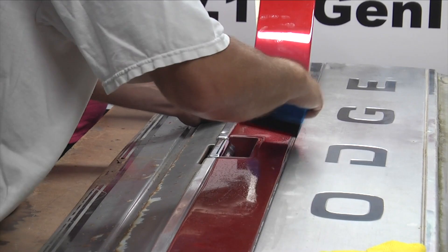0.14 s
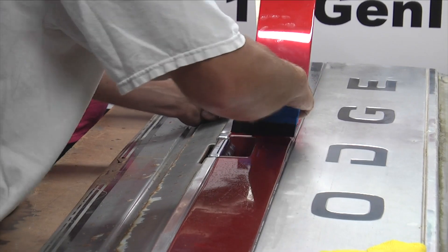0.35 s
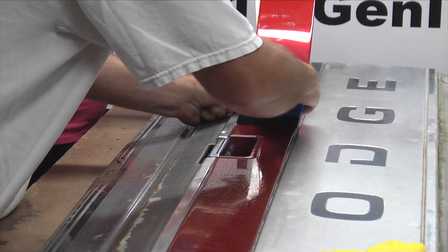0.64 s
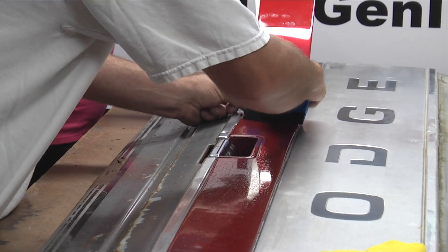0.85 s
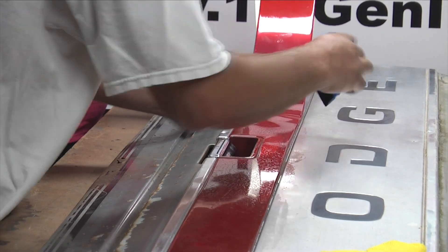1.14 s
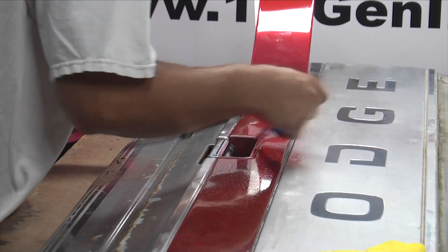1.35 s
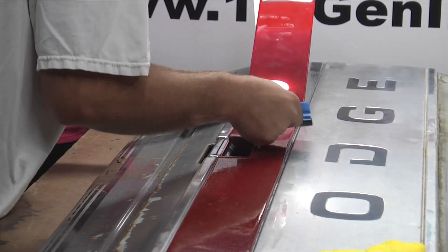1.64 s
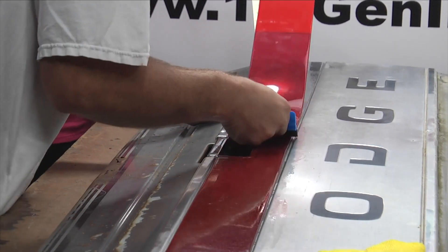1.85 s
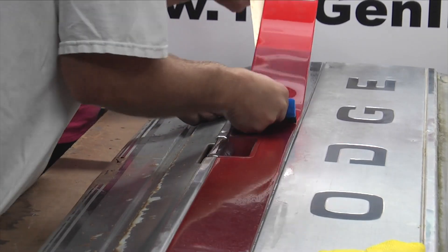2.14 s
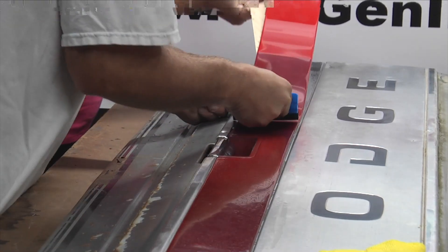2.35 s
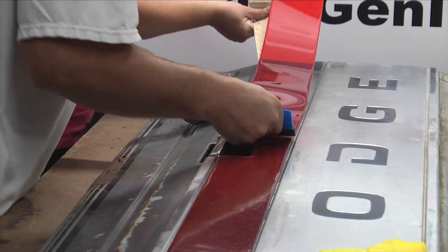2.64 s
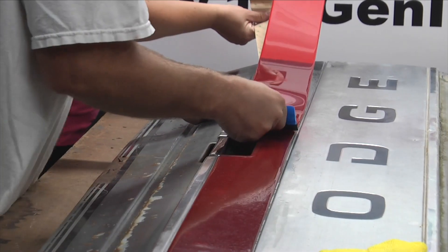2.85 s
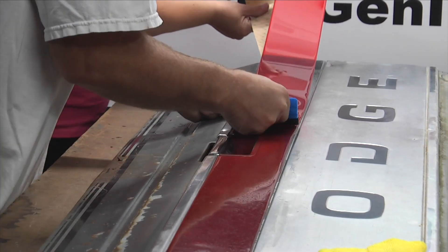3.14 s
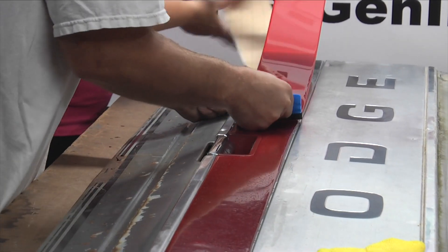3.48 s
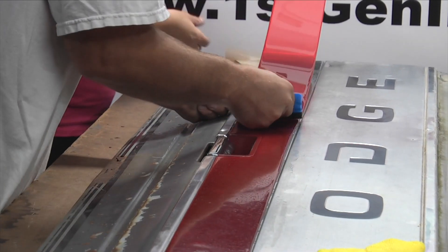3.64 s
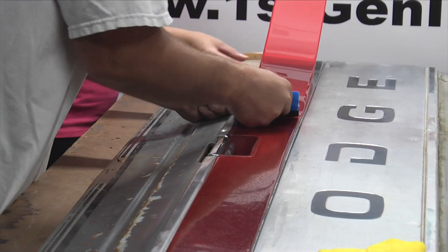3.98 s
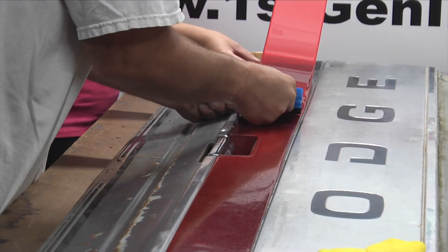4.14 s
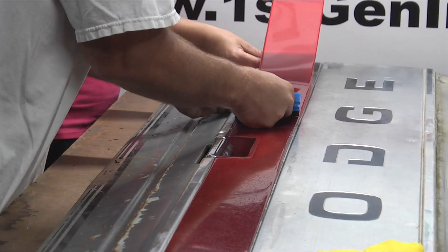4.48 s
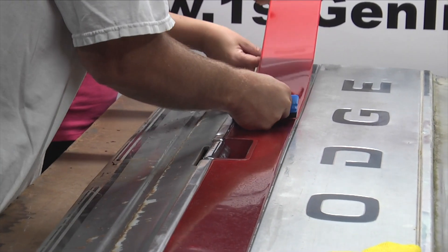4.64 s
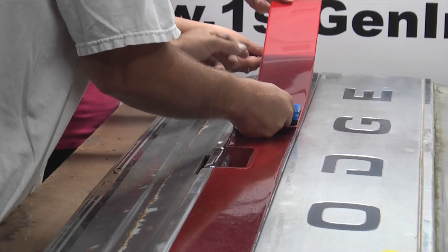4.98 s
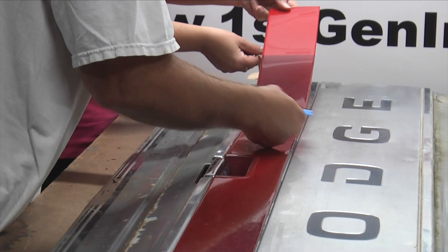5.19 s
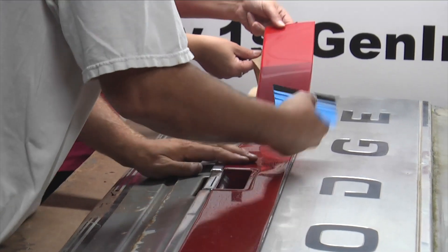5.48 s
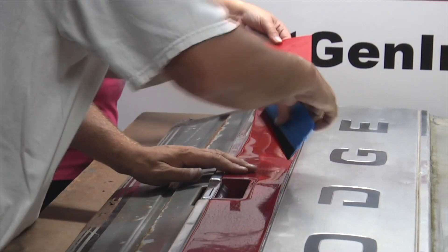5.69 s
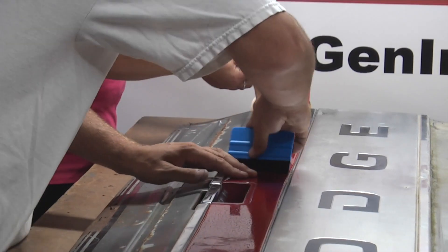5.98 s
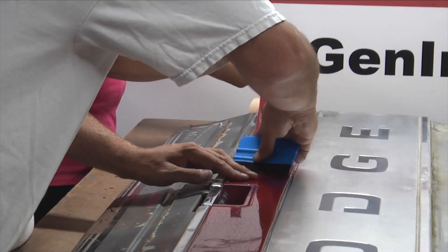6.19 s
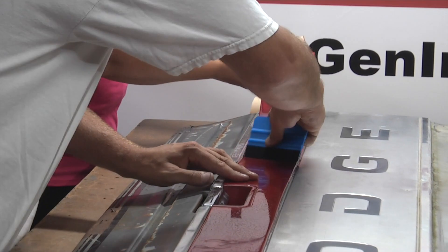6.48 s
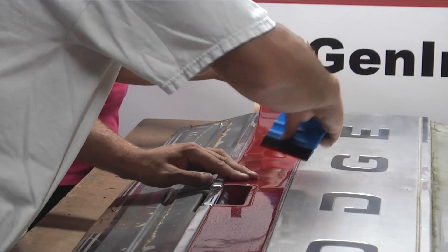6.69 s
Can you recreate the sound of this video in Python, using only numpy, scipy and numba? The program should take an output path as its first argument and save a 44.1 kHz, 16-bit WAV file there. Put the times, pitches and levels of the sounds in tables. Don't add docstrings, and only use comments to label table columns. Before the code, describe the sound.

A small close microphone in a garage hears a felt-edged squeegee on a hollow metal panel, over dull low room tone that sinks after loud moments. From 0 s there is faint hiss, with a double low thump at 0.3, a few ticks at 0.7-0.85 and a deep boom and knock near 1.0. It quiets, with soft bumps at 1.6 and 1.9. A breathy felt slide swells to 2.3 with a thud; a hoarse scrape follows at 2.6 and a knock at 2.7. From 2.9 to 4.5 it is loudest: snapping ticks, hard bangs at 3.2-3.4, a fast juddering scrape to 3.65, more bangs at 3.95 and 4.1, sharp clicks to 4.5. Rustling hiss and scraping rise to a bright snap at 4.85, then ease. Light bumps come near 5.2 and 5.5, a short scrape at 5.8, a hard honking knock at 6.0, small ticks around 6.3-6.6, and a sharp snap at 6.8.

```python
import sys
import numpy as np
from scipy import signal
from scipy.fft import rfft, irfft
from scipy.io import wavfile
from scipy.ndimage import uniform_filter1d
from numba import njit

SR = 44100
rng = np.random.default_rng(int(sys.argv[2]) if len(sys.argv) > 2 else 0)


def unload_wav(signal):
    wavfile.write(
        sys.argv[1],
        SR,
        np.round(np.clip(np.atleast_2d(signal).T, -1, 1) * 32767).astype(np.int16),
    )


def natural_amplitude(level_db):
    exponent = np.asarray(level_db, float) / 20
    return 10 ** exponent


N = 300762


def table(rows, at, log=False):
    x, *columns = np.transpose(rows)
    if log:
        x, at = np.log(x), np.log(at)
    return np.array([np.interp(at, x, column) for column in columns])


def unit(x):
    return x / np.sqrt(np.mean(x ** 2))


def band(x, lo_hz, hi_hz):
    sos = signal.butter(2, [lo_hz, min(hi_hz, .45 * SR)], "band", fs=SR, output="sos")
    return signal.sosfilt(sos, x)


def walk(rate_hz):
    hold = int(SR / rate_hz)
    steps = np.repeat(rng.standard_normal(N // hold + 1), hold)
    return unit(uniform_filter1d(steps, hold)[:N])


def grains(spread_db, ceiling):
    return rng.standard_normal(N) * natural_amplitude(spread_db * np.minimum(rng.exponential(size=N), ceiling))


def add(line, s, x):
    i = int(s * SR)
    line[..., i:i + x.shape[-1]] += x[..., :N - i]


def swells(rows, t, rest_db, other_rest_db, roundness):
    s, db, rise, fall, other_db = np.transpose(rows)[:, :, None]
    late = t - s
    away = np.where(late < 0, -late / np.maximum(rise, .002), late / np.maximum(fall, .002))
    power = natural_amplitude(2 * np.maximum(db - 20 * away ** roundness, -200))
    main = power.sum(0) + natural_amplitude(2 * rest_db)
    other = (power * natural_amplitude(2 * other_db)).sum(0) + natural_amplitude(2 * other_rest_db)
    return 10 * np.log10([main, other])


def gestures():
    # (peak time [s], boom level [dB],
    # swell per 20 dB [s], fade per 20 dB [s], drumming against boom [dB])
    pushes = [(0.0, -28.5, .05, 0.25, -26), (.3, -13, 0.04, -0.06, -30), (.78, -20, -0.67, 0.15, -16.5),
              (.95, -6, 0.32, 0.11, -16.5), (1.61, -27.5, 0.1, -0.25, -8), (1.9, -27.5, 0.25, 0.1, -11.5),
              (2.35, -10.5, 0.2, 0.01, -11.5), (2.74, -21.5, -0.07, -0.1, -1), (2.87, -30, 0.2, -2.2, -13),
              (3.11, -8.5, 0.17, 0.28, -17.5), (3.25, -18.5, 0.13, 0.66, -12),
              (3.44, -8.5, 0.36, 0.23, -26), (3.55, -19, 0.23, 0.14, 7.5), (3.62, -9.5, 0.37, 0.18, -12),
              (3.97, -8, 0.05, -0.37, -30), (4.03, -7.5, 0.1, -0.65, -24), (4.12, -9, 0.04, 0.2756, -3.5),
              (4.52, -24, 1.1, 0.07, -11), (4.86, -36, 1.5, 0.9, -5), (5.51, -29.5, -0.1, 0.4, -21),
              (6.01, -18, 0.08, 0.22, -14), (6.15, -28.5, 0.8, 0, -10), (6.3, -25, -0.2, .5, -17),
              (6.57, -32, 0, 0, -37)]
    # (peak time [s], hiss level [dB],
    # swell per 20 dB [s], fade per 20 dB [s], scrape against hiss [dB])
    strokes = [(0.0, -42, .01, 0.3, -7), (.18, -45, 0, 0.5, -9), (.57, -39, 0.3, 0.7, -6.5),
               (.95, -44.5, 1.5, 2, -4.5), (1.67, -43, 1, 14, -4), (2.24, -30, 0.46, 0.48, -2),
               (2.56, -34.5, -0.1, 0.34, 7), (2.61, -43, -0.13, 0.1, 16), (2.92, -32.5, 0.13, 0.53, -0.5),
               (3.27, -50.5, 0, 0.2, 13.5), (3.55, -45, 0.2, 0.3, 15), (3.76, -49, -3.2, 0.5, 10),
               (4.12, -28.5, 0.19, 0, -1), (4.48, -32, -0.33, 1, -3), (4.7, -33.5, 0.1, -1.5, -0.5),
               (4.86, -26.5, 0.14, 0.02, -2.5), (4.94, -43.5, 1.5, 0.57, 8.5), (5.84, -32.5, 0.08, 0.09, 4),
               (6.08, -37, 0.54, 0.06, 1), (6.34, -37, 1.13, 2.5, -22), (6.51, -42, 0.1, 0.2, 6),
               (6.6, -39, 1, 17, -0.5), (6.8, -54, -0.25, -2.5, 24)]
    t = np.arange(0, N + 44, 44) / SR
    pressure = swells(pushes, t, rest_db=-47, other_rest_db=-46.5, roundness=1.24)
    sliding = swells(strokes, t, rest_db=-71.5, other_rest_db=-79, roundness=1.116)
    return table(np.vstack([t, pressure, sliding]).T, np.arange(N) / SR)


def releases():
    # (time [s], peak level [dB], centre [Hz], click and kick into the panel [dB])
    clean = [(0.725, -27, 4230, -28), (0.7991, -27, 4440, -26), (0.8366, -30.5, 4570, -22.5),
             (1.2939, -30, 4130, -25), (2.556, -26, 5400, -26), (2.726, -29, 3650, -28),
             (2.906, -15.5, 9500, -45), (2.963, -25.5, 5550, -38), (2.9768, -23.5, 9700, -36),
             (3.2147, -23.5, 4820, -21), (3.2332, -19.5, 4570, -2.5), (3.343, -29, 4080, -27),
             (3.3563, -12, 4200, -3), (3.484, -22.5, 3360, 1), (3.5048, -12, 3700, -8.5),
             (3.78, -35, 4250, -24), (4.0986, -12.5, 4600, -2.5), (4.1992, -16, 3914, -2),
             (4.2401, -19, 3750, -11), (4.4834, -12.5, 3760, -9.5), (5.9867, -34, 5080, -3.5),
             (6.192, -37, 3000, -17.5), (4.2041, -32, 2800, -13), (1.441, -35, 2500, -22),
             (6.5751, -27, 5370, -17)]
    # (time [s], peak level [dB], centre [Hz], click and kick into the panel [dB])
    rips = [(1.0498, -21, 3900, -17), (1.6722, -37, 9050, -26.5), (2.9852, -29, 5360, -31),
            (3.0527, -27, 3300, -32), (3.0824, -17.5, 6960, -15), (3.1177, -26.5, 4160, -13.5),
            (3.2206, -12.5, 3970, -10.5), (3.3384, -24, 3850, -3.5), (3.6775, -52.5, 3800, -23),
            (3.75, -24.5, 3920, -18.5), (3.9515, -26.5, 3830, -11.5), (4.1596, -33, 3520, -6.5),
            (4.1777, -43, 4300, -12.5), (4.7883, -20.5, 3670, -45), (4.851, -7.5, 3800, -6.5),
            (5.0709, -29, 3720, -17), (5.222, -29.5, 3034, -8), (5.5167, -37.5, 4070, -29),
            (6.321, -25, 3680, -22), (6.355, -20.5, 3570, -18.5), (6.4867, -21.5, 4020, -20.5),
            (6.5215, -38, 4150, -11.5), (6.5398, -34, 5030, -16), (6.7417, -33, 3610, -17.5),
            (6.792, -4.5, 3400, -4.5)]
    # (time [s], peak level [dB], kick level [dB])
    judders = [(3.4378, -15, -10), (3.4501, -38, -6), (3.4657, -22, -6), (3.5178, -29, -10),
               (3.5304, -15, -15.5), (3.5422, -19, -11), (3.5554, -19, -16.5), (3.5682, -25, -13),
               (3.5797, -27, -15), (3.5917, -26.5, -16), (3.6034, -24, -22), (3.6148, -23, -10.5),
               (3.6277, -24, -15), (3.6409, -24, -18), (3.6523, -31, -15), (3.9283, -22, -21),
               (3.9403, -20.5, -10.5), (4.1091, -14, -6.5), (4.1214, -13, -11), (4.1324, -20, -9),
               (4.1455, -14.5, -25)]
    clean_rattle_db, rip_rattle_db = -23.5, -8
    rows = [(*r, clean_rattle_db) for r in clean] + [(*r, rip_rattle_db) for r in rips]
    for (s, db, kick_db), colour in zip(judders, rng.standard_normal(40)):
        rows.append((s, db - 4.5, 4800 * (1 + 0.059 * colour), kick_db + 0.5, clean_rattle_db))
    return rows


def rubbing(hand):
    grain = unit(rng.standard_normal((3, N)) * natural_amplitude(2.0 * rng.exponential(size=(3, N))))
    waver_db = np.array([2.5 * walk(25), 2.0 * walk(40), 1.5 * walk(50)])
    boom_drum_scrape_db = hand[[0, 1, 3]]
    force = natural_amplitude(boom_drum_scrape_db + waver_db + np.array([[-5.5], [0], [-12]])) * grain
    scrape = natural_amplitude(23.0) * band(force[2], 400, 2270)
    return force, scrape


def blows(hand, slips):
    # (time [s], body [dB], boom [dB], clank [dB], pitch [Hz])
    thuds = [(0.721, -26, -7.5, -48, 322), (0.833, -25, -11, -24, 300), (.972, -16.5, -6, -36, 205),
             (1.6, -28.5, -20, -33, 392), (1.886, -25.5, -15.5, -53, 207), (2.302, -10, -1.5, -19, 336),
             (3.083, -9.5, 1, -11.5, 550), (5.555, -31.5, -38.5, -31.5, 1040), (.908, -32, -12.5, -32, 795)]
    # (time [s], body [dB], boom [dB], clank [dB], pitch [Hz])
    raps = [(0.0, -30.5, -25, -42, 228), (.281, -17, -14, -36, 287), (.291, -15.5, -9.5, -39, 290),
            (1.049, -12, -6, -32, 326), (2.344, -16, -10, -28, 220), (2.724, -9.5, -10.5, -41, 283),
            (3.123, -9.5, -28, -19.5, 280), (3.214, -5, -22, -12, 1020), (3.338, 0.5, -9, -14, 484),
            (3.392, -10, -9, -24, 462), (3.928, -10, -7, -25, 480), (3.95, -3.5, -7, -13, 490),
            (4.097, -2.5, 2, -11.5, 185), (4.487, -29, -27, -30, 198), (5.222, -24, -33, -27.5, 760),
            (5.503, -24.5, -16, -57, 230), (5.9811, -6, -15, -31, 377), (5.9855, -4, -9.5, -11, 420),
            (6.138, -31.5, -20.5, -27, 203), (6.297, -26, -13, -43, 197), (6.576, -17.5, -10.5, -28, 402),
            (6.787, -23, -41, -44, 418)]
    # (from [Hz], to [Hz])
    force_bands = [(60, 220), (220, 800), (800, 2500)]
    thud_ms, rap_ms = 16, 4.54
    force, t = np.zeros((3, N)), np.arange(4096) / SR
    knocks = [(*r, thud_ms) for r in thuds] + [(*r, rap_ms) for r in raps]
    ragged = rng.standard_normal((len(knocks), 3, len(t)))
    for (s, body_db, boom_db, clank_db, hz, contact_ms), rag in zip(knocks, ragged):
        span = contact_ms / 1000 * np.array([[2.5], [1.], [.8]])
        push = np.exp(-t / span) / np.sqrt(1000 * span)
        push[0] *= 1 - np.exp(-t / 0.0022)
        push[1] *= 1 - np.exp(-t / 0.0018)
        push = push * rag
        push = push + natural_amplitude(1.0) * band(push, 0.6 * hz, 1.65 * hz)
        size = [[np.linalg.norm(band(p, lo, hi)) / np.sqrt(hi - lo)] for p, (lo, hi) in zip(push, force_bands)]
        level_db = np.array([[boom_db - 20.0], [body_db - 17.0], [clank_db - 15.0]])
        add(force, s, natural_amplitude(level_db) * push / size)
    for (s, _, _, kick_db, _), rag in zip(slips, rng.standard_normal((90, 3, 128))):
        pressed_db = min(0, 0.5 * (hand[0, int(s * SR)] + 16))
        level_db = kick_db + pressed_db + np.array([[6], [11], [3]])
        add(force, s, natural_amplitude(level_db) * np.exp(-t[:128] / 0.00083) * rag)
    return force


@njit
def ring(force, share, pole, grip):
    out = np.zeros(force.shape[1])
    for m in range(len(pole)):
        z = 0j
        for i in range(len(out)):
            push = share[0, m] * force[0, i] + share[1, m] * force[1, i] + share[2, m] * force[2, i]
            z = z * pole[m] + grip[m, i >> 8] * push
            out[i] += z.imag
    return out


def panel(force):
    # (frequency [Hz], level [dB], t60 [s])
    low_modes = [(80.4, 8.5, 0.26), (97, 2, 0.16), (110.3, -3.5, 0.25), (120.7, -12, 0.26), (136, 4, 0.064),
                 (148.9, 1, 0.091), (172.5, 0.5, 0.22), (189.7, -4, 0.14), (207, 0, 0.26), (242, -9, 0.07),
                 (287.5, -5, 0.18), (311.5, 4.5, 0.084), (392, 1, 0.3), (437, -5, 0.051),
                 (475.6, 1.5, 0.15), (524, 0.5, 0.078), (590, -3, 0.028), (747, -8, 0.074),
                 (1020, 7, 0.011)]
    # (frequency [Hz], level [dB])
    crowd_db = [(220, -6), (400, -5), (680, -11.5), (1200, -4.5), (2200, -19.5), (3500, -19)]
    # (frequency [Hz], t60 [s])
    crowd_t60 = [(220, 0.3), (600, 0.079), (850, 0.19), (1500, 0.22), (3500, 0.032)]
    # (time [s], frequency [Hz])
    place = [(0.0, 136), (.3, 141), (1.0, 136), (1.5, 125), (2.4, 125), (2.73, 149), (3.1, 119),
             (3.44, 119), (3.63, 139), (4.02, 91), (4.12, 157), (4.35, 130), (5.7, 130), (6.0, 153),
             (6.2, 136), (6.6, 155)]
    hz = 220 + 3280 * ((np.arange(70) + rng.random(70)) / 70) ** 1.5
    crowd = np.array([hz, table(crowd_db, hz, True)[0], table(crowd_t60, hz, True)[0]])
    hz, db, t60 = np.hstack([np.transpose(low_modes), crowd])
    share = table([(190, 1, 0, 0), (235, 0, 1, 0), (750, 0, 1, 0), (1000, 0, 0, 1)], hz, True)
    pole = np.exp(2j * np.pi * hz / SR - np.log(1000) / (np.maximum(t60, .01) * SR))
    t = np.arange(N // 256 + 1) * 256 / SR
    start, speed = rng.random((2, len(hz), 1))
    grip = np.sign(speed - .5) * (1 + .4 * np.cos(2 * np.pi * (start + (.6 + 1.5 * speed) * t)))
    off = np.log(hz[:, None] / table(place, t)[0]) / 0.41
    grip = grip * (1 + share[0][:, None] * (1.58 * np.exp(-off ** 2) - .4))
    mode_gain = natural_amplitude(db - 9) * np.sqrt(1 - abs(pole) ** 2)
    sound = ring(force + 1e-18, share, pole, grip * mode_gain[:, None])
    return signal.sosfilt(signal.butter(4, 74, "high", fs=SR, output="sos"), sound)


def ticks(slips):
    out, t = np.zeros(N), np.arange(2048) / SR
    crack = t / 0.00088 * np.exp(1 - t / 0.00055)
    rattle = np.exp(-t / 0.017)
    for (s, db, hz, click_db, rattle_db), rag in zip(slips, rng.standard_normal((90, len(t)))):
        evenness = np.sqrt(np.sum((rag * crack) ** 2) / np.sum(crack ** 2))
        snap = rag * (crack / evenness + natural_amplitude(rattle_db) * rattle)
        coloured = band(snap, 0.69 * hz, 1.187 * hz) + natural_amplitude(-4.0) * band(snap, 1930, 8100)
        add(out, s, natural_amplitude(db + 4.0) * coloured)
        add(out, s, natural_amplitude(click_db + 10.5) * band(snap, 720, 1896))
    return out


def felt(hand):
    # (start [s], length [s], level [dB])
    skids = [(0.732, 0.018, -36.5), (0.803, 0.033, -38), (0.855, 0.036, -39), (0.912, 0.034, -35),
             (0.972, 0.039, -34.5)]
    # (centre [Hz], width [Hz], level [dB])
    resonances = [(3490, 500, -11.5), (4700, 1800, -3), (5950, 1640, -6.5), (8400, 2900, -6),
                  (11900, 6900, -5.5)]
    t = np.arange(N) / SR
    hiss_db = hand[2]
    top_db = 2 + 0.0093 * (hiss_db + 40)
    skid = sum(natural_amplitude(db) * ((t > s) & (t < s + length)) for s, length, db in skids)
    level = natural_amplitude(hiss_db - 2.0) + uniform_filter1d(skid, 132)
    shared_db, out = 1.1 * walk(30), 0
    for hz, width_hz, db in resonances:
        grain = grains(2.3, 6)
        tone_db = db - 8.5 + (hz > 7000) * top_db + shared_db + 0.13 * walk(2.6)
        out = out + natural_amplitude(tone_db) * unit(band(grain, hz - width_hz / 2, hz + width_hz / 2))
    return level * out


def drags():
    # (peak time [s], level [dB], swell [s], fade [s], pitch [Hz])
    songs = [(.56, -51.5, 0.17, .2, 3220), (.58, -49, 0.26, 0.26, 4470), (0.854, -33, 0.047, .06, 1030),
             (0.978, -39.5, .06, 0.045, 1350), (2.24, -43, .25, .12, 5000), (2.27, -44.5, 0.34, .2, 6200),
             (2.59, -34, .05, 0.14, 1190), (2.61, -35, 0.072, 0.12, 1730), (2.63, -39, 0.064, .1, 2280),
             (3.55, -27, 0.17, 0.18, 1085), (3.57, -30, 0.18, 0.17, 1880), (3.756, -32, .01, 0.043, 1600),
             (3.96, -21.5, 0.034, 0.064, 890), (4.15, -31.5, 0.074, 0.17, 2300),
             (4.65, -40, 0.11, 0.054, 1250), (4.67, -40, 0.19, 0.059, 3560), (4.8, -38, 0.069, 0.092, 1220),
             (4.82, -35, 0.089, 0.18, 3120), (4.84, -30.5, 0.12, 0.13, 2100),
             (5.002, -49, 0.25, 0.87, 2950), (5.8, -36, 0.077, 0.11, 1300), (5.82, -42, .12, .2, 2900),
             (5.87, -38, .04, .03, 1450), (5.995, -22, 0.011, 0.065, 1345), (6.52, -41, 0.16, .1, 1470),
             (6.73, -39, 0.16, 0.09, 1480)]
    half_width = 0.085
    t, out = np.arange(N) / SR, 0
    grain = grains(2.0, 5) * natural_amplitude(1.6 * walk(40))
    for s, db, swell, fade, hz in songs:
        away = np.where(t < s, (s - t) / max(swell, .01), (t - s) / max(fade, .01))
        tone = unit(band(grain, hz * (1 - half_width), hz * (1 + half_width)))
        out = out + natural_amplitude(db - 20 * np.minimum(away, 4) ** 2) * tone
    return out


def paper():
    # (start [s], length [s], level [dB], swell [s], fade [s])
    rustles = [(1.653, 0.17, -42, .01, 0.19), (1.94, 0.36, -40.5, 0.08, 0.065),
               (2.55, .085, -33.5, .004, 0.018), (2.725, 0.15, -40, 0.0081, .02),
               (3.743, 0.035, -40, .004, 0.023), (4.434, 0.034, -33, 0.0032, 0.015),
               (4.505, 0.39, -35, 0.095, 0.059), (5.49, 0.33, -44, .01, 0.033),
               (5.737, 0.19, -35, .03, .05), (6.352, .18, -35.5, .01, .02)]
    t, level = np.arange(N) / SR, 0
    for s, length, db, swell, fade in rustles:
        rise = np.clip((t - s) / max(swell, .003), 0, 1)
        fall = np.exp(-np.maximum(t - s - length, 0) / max(fade, .005))
        level = level + natural_amplitude(db) * rise * fall
    grain = grains(2.0, 6)
    crackle = unit(band(grain, 4100, 13700) + natural_amplitude(-5) * band(grain, 2500, 7000))
    return level * natural_amplitude(2.2 * walk(45) - 4.5) * crackle


def walls(x, t60, wet_db):
    t = np.arange(SR // 2) / SR
    low = band(rng.standard_normal(len(t)), 68, 1900) * np.exp(-np.log(1000) * t / t60)
    high = band(rng.standard_normal(len(t)), 3100, 11400) * np.exp(-np.log(1000) * t / (0.42 * t60))
    tail = (low + 0.69 * high) * (t > .008)
    return x + natural_amplitude(wet_db) * signal.fftconvolve(x, tail / np.sqrt(np.sum(tail ** 2)))[:N]


def garage():
    # (frequency [Hz], level per Hz [dB])
    spectrum = [(15, -35), (25, 7.5), (180, -2), (249, -1), (335, -7.5), (754, -6.5), (988, -8.5),
                (1290, -1), (1940, -25.5), (2990, -24), (3720, -33), (8830, -27), (16000, -30.5)]
    hz = np.maximum(np.fft.rfftfreq(N, 1 / SR), 1)
    tone = irfft(rfft(rng.standard_normal(N)) * natural_amplitude(table(spectrum, hz, True)[0]), N)
    return natural_amplitude(-38 + 0.8 * walk(1.37)) * unit(tone)


@njit
def follow(x, attack, release):
    out, e = np.empty(len(x)), 0.
    for i in range(len(x)):
        e += (abs(x[i]) - e) * (attack if abs(x[i]) > e else release)
        out[i] = e
    return out


def scene():
    hand, slips = gestures(), releases()
    force, scrape = rubbing(hand)
    sheet = panel(force + blows(hand, slips))
    edge = scrape + ticks(slips) + felt(hand) + drags()
    work = walls(sheet + edge + paper(), t60=0.59, wet_db=-16.0)
    loud = follow(work, 1 / (0.0033 * SR), 1 / (.15 * SR))
    duck = np.minimum(1, (natural_amplitude(-12.5) / (loud + 1e-9)) ** 1.8)
    return (work + duck * garage())[None]


def roll_off(x):
    return signal.sosfilt(signal.butter(12, 16490, fs=SR, output="sos"), x)


def record(dry):
    x = signal.sosfilt(signal.butter(2, 55, "high", fs=SR, output="sos"), dry)
    x = np.clip(x, -.995, .995)
    x = signal.sosfilt(signal.ellip(10, .2, 80, 15800, fs=SR, output="sos"), x)
    return roll_off(x)


dry = scene()
out = record(dry)
unload_wav(out)
```